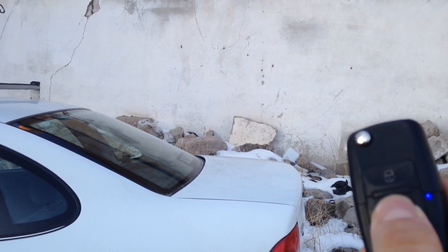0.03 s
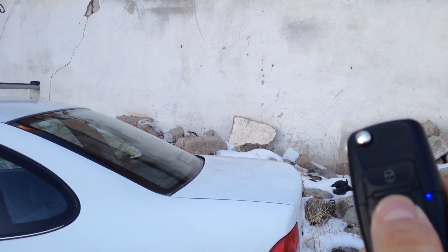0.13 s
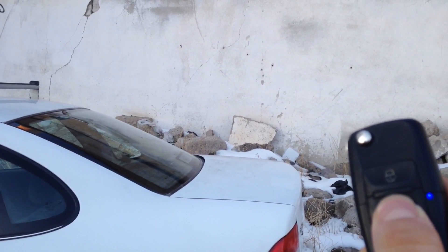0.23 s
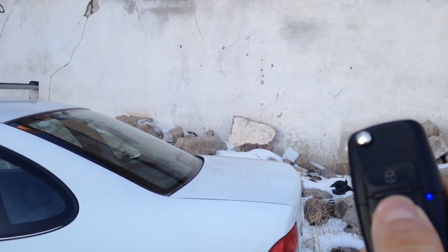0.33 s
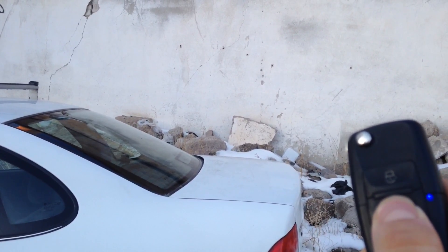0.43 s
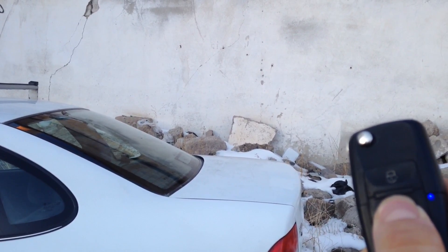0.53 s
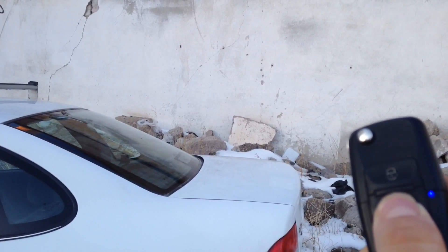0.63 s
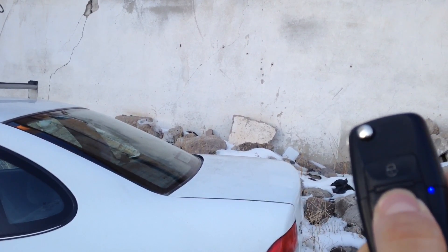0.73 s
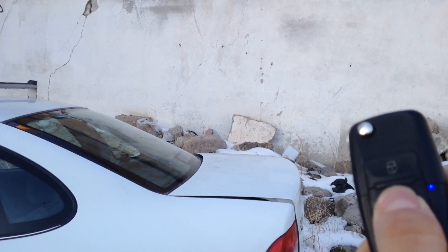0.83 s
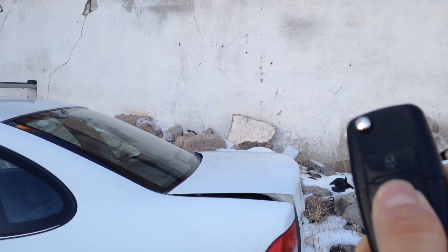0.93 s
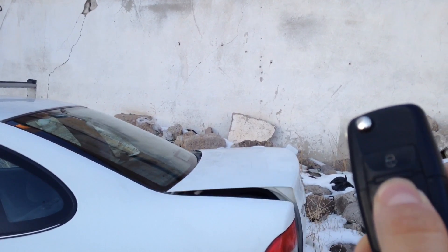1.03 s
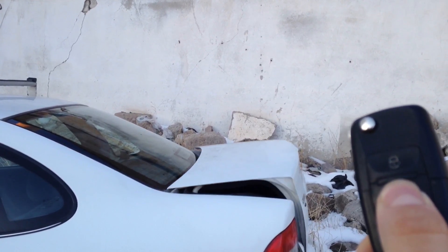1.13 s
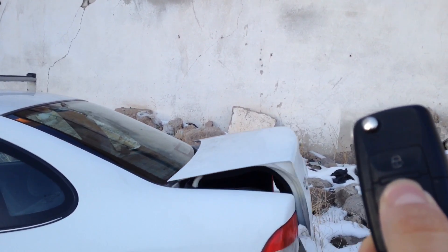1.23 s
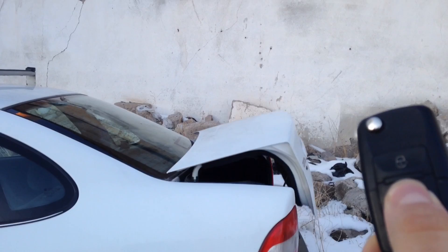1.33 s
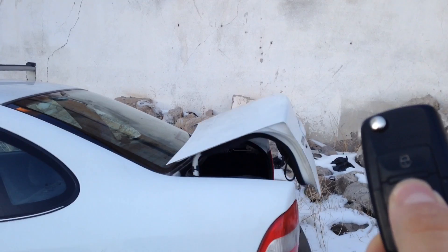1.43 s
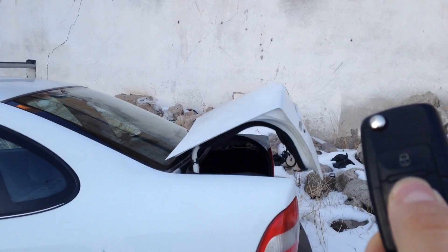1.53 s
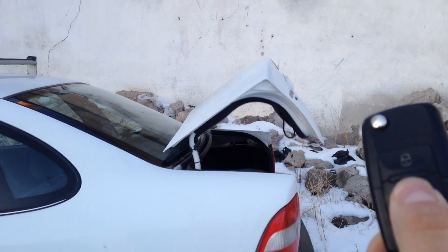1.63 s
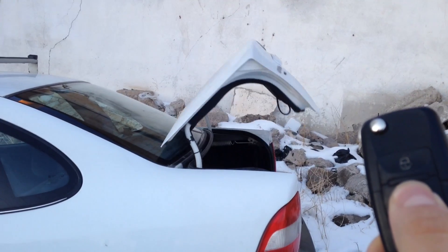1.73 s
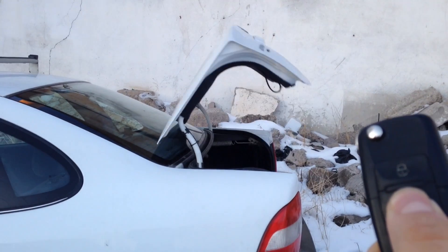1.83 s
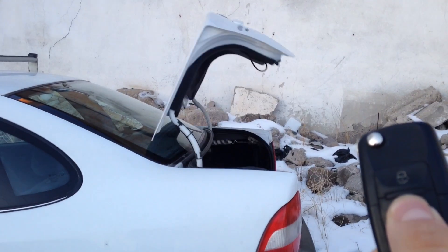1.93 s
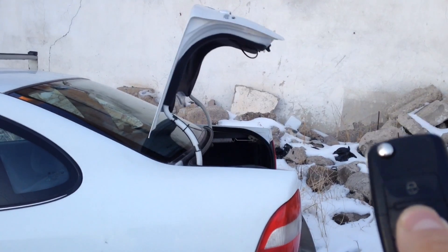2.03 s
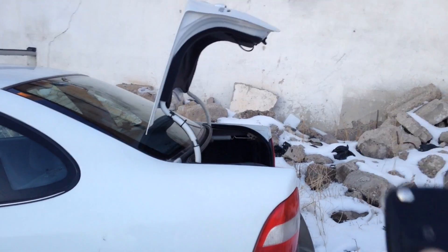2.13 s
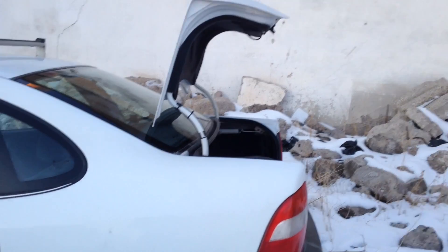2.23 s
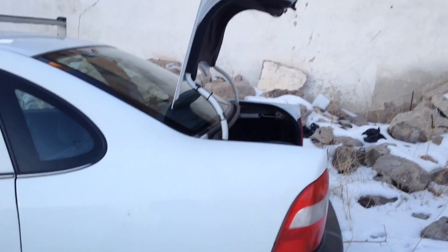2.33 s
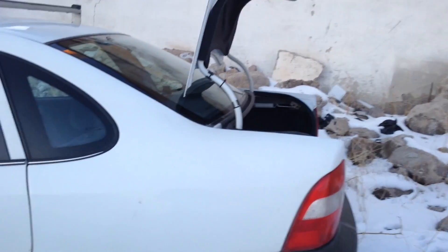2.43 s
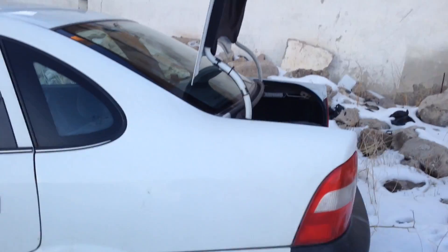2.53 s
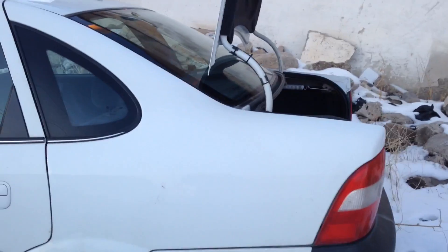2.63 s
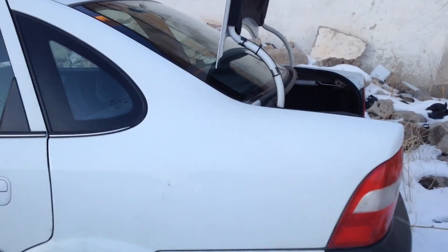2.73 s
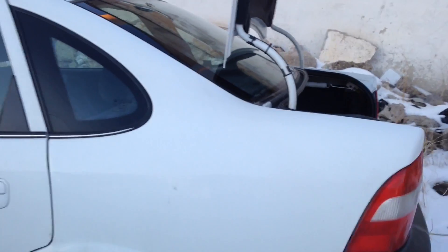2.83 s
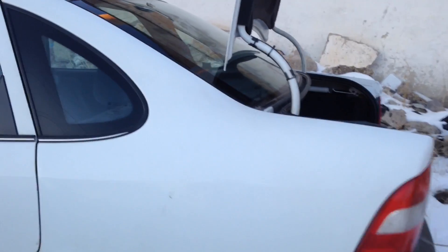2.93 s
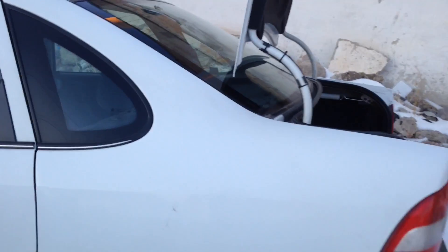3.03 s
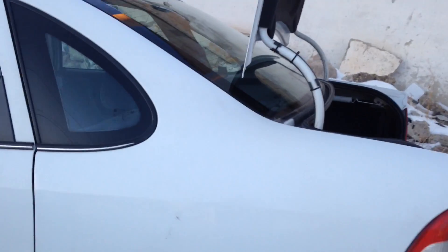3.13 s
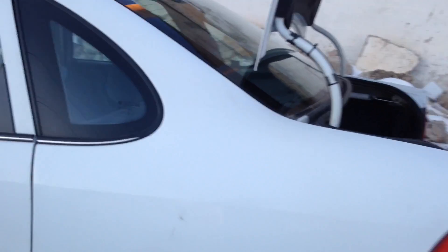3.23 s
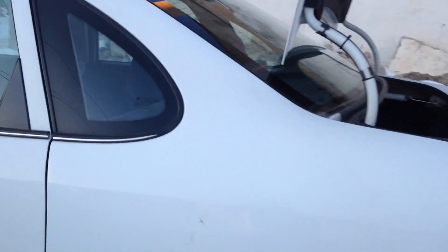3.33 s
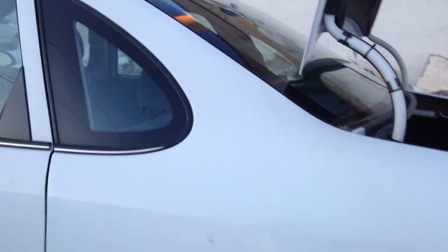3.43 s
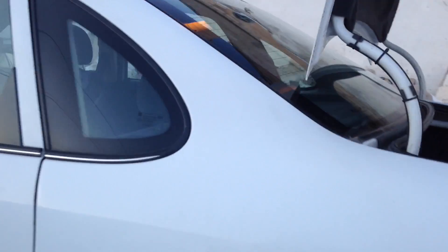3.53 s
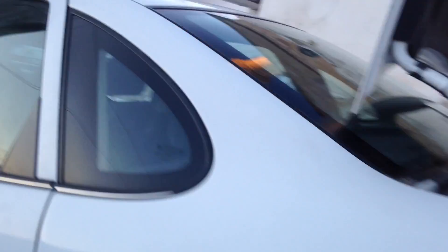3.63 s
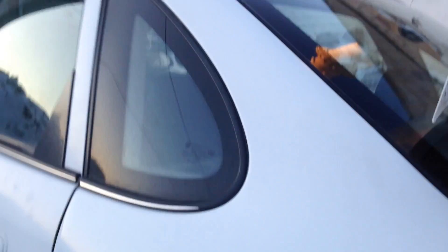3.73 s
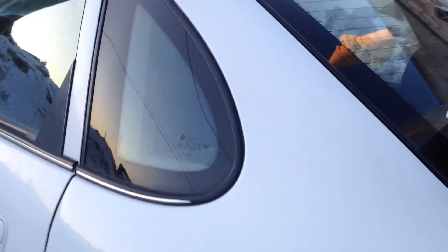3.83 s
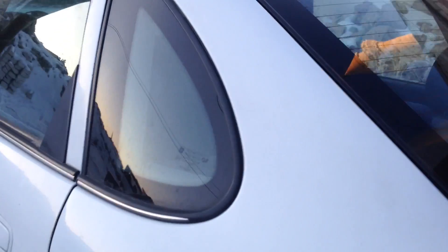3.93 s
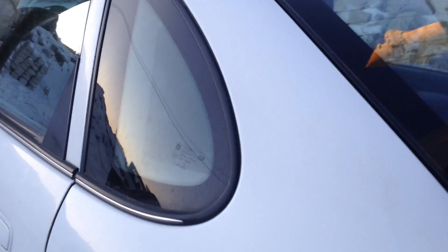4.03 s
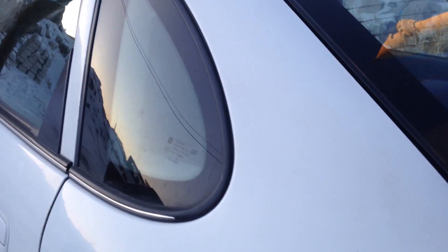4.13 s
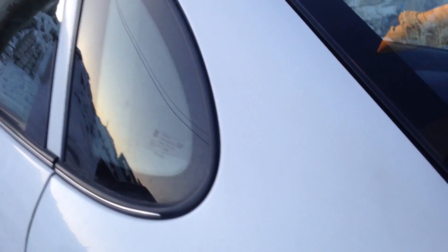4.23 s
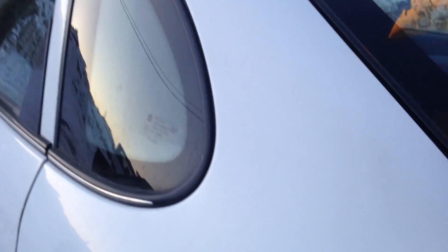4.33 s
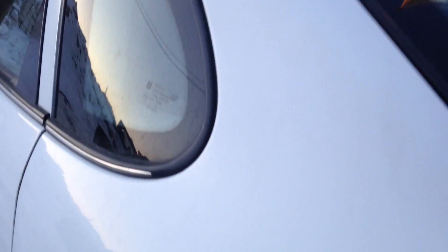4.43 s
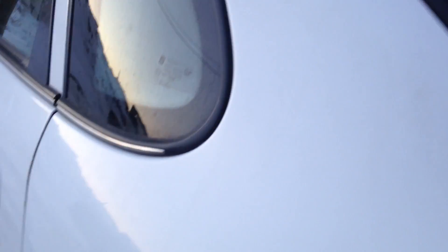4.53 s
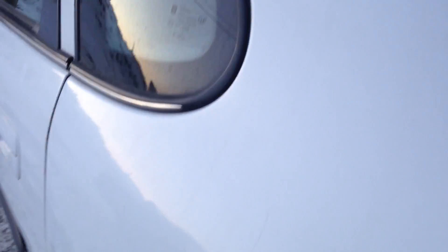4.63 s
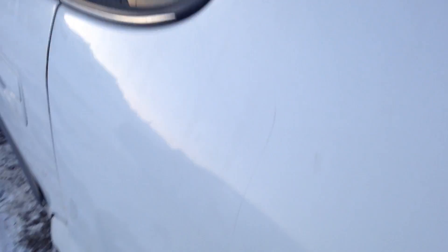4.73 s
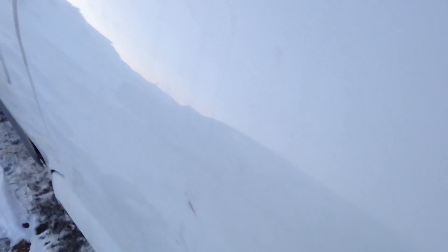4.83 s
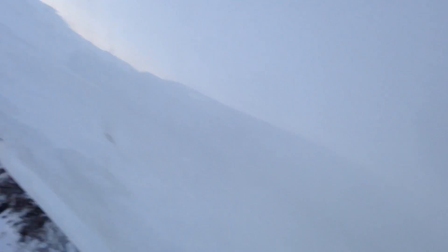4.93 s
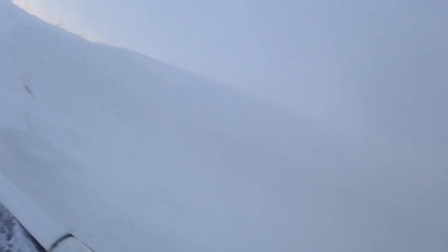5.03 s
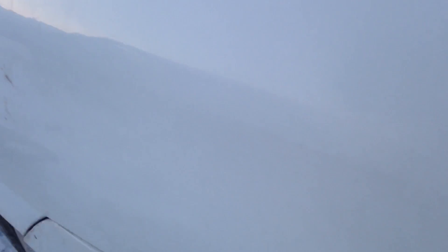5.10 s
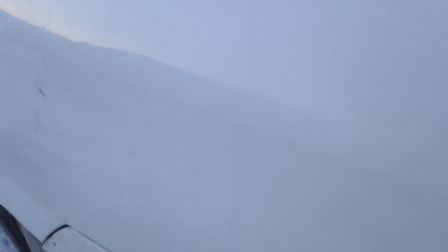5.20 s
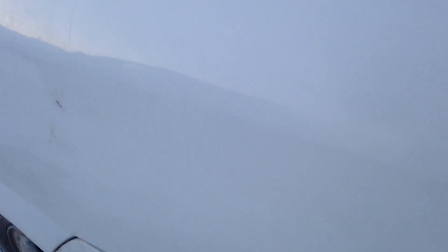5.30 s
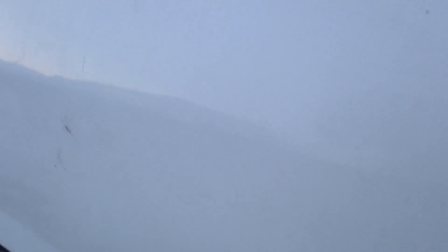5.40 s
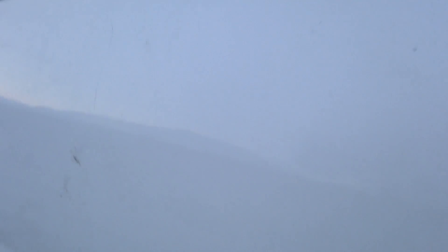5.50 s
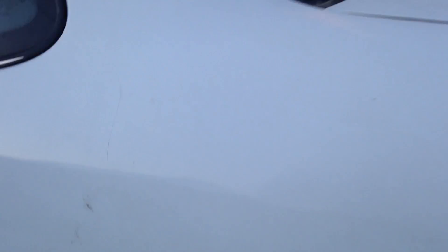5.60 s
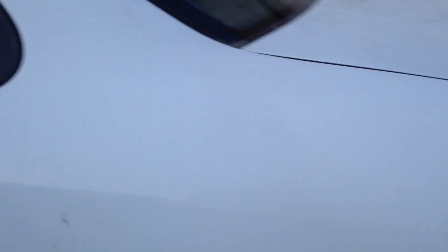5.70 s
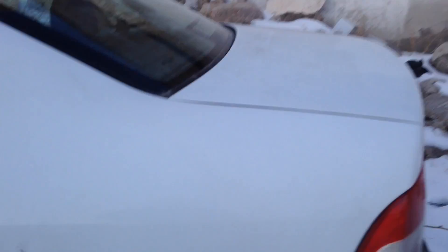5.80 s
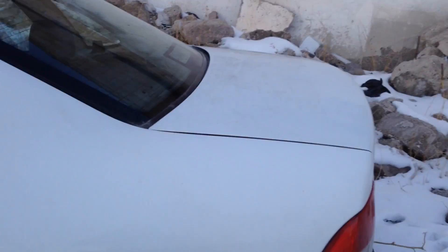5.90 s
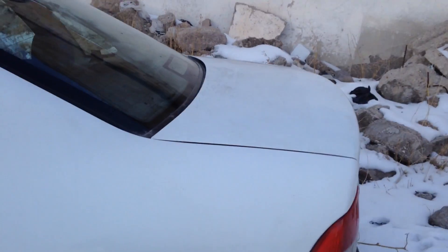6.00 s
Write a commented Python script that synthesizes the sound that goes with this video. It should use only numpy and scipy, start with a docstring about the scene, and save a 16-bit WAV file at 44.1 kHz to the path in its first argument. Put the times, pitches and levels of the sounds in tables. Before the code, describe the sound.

A car boot lock pops open with a short electric whirr and a muffled clunk, close to a hand-held microphone outdoors. Soft hinge jolts and sleeve swishes follow, then uneven footfalls, gritty scrapes, rustling clothes and handling rumble. Near the end the boot lid slams, by far the loudest event, clashing and booming briefly, before a few heavy bumps and a last scuff.

```python
"""A car boot is released by remote: motor noise whirrs, then damped modes and decaying noise clunk at the latch.
The lid, a low damped resonator, jolts on its hinges as it rises. Someone walks over on frozen ground: friction
noise scuffs, filtered noise and snaps rustle as clothes, damped resonances thump and tiny contacts tick.
The lid is grabbed and slammed: air rumbles, panel modes clash and cavity modes boom; then a low hum, thumps,
a last scuff and rustle are heard. Coloured noise makes the quiet outdoor air throughout."""
import sys
import numpy as np
from scipy import signal
from scipy.io import wavfile
from scipy.ndimage import uniform_filter1d

SR = 44100
rng = np.random.default_rng(int(sys.argv[2]) if len(sys.argv) > 2 else 0)


def dump(signal):
    """Clip the signal to [-1, 1] and save it as 16-bit WAV at the path in sys.argv[1]."""
    limited = np.clip(np.atleast_2d(signal).T, -1, 1)
    pcm = np.round(limited * 32767).astype(np.int16)
    wavfile.write(sys.argv[1], SR, pcm)


N = 267246
TIME = np.arange(N) / SR
EDGES_HZ = 20 * 2 ** (np.arange(30) / 3)   # third octaves
CENTRES_HZ = np.sqrt(EDGES_HZ[1:] * EDGES_HZ[:-1])
CUTOFF_HZ = 15400

# contacts of the slam: (time [s], level [dB], tilt [dB per octave], ring length [factor])
SLAM_CONTACTS = [(5.2078, -22.5, 2, 0.65), (5.2130, -15, -1, 0.77), (5.217, -16, -0.5, 0.82),
                 (5.2207, -21, 2, 0.2), (5.2396, -13.5, -2, 0.39), (5.249, -37.5, 6, 0.69),
                 (5.2713, -31.5, 4.5, 0.22), (5.3109, -42, -2, 1.0), (5.33, -39, -4, 0.98)]
# spectrum of the slam's dense ring: (frequency [Hz], level [dB])
SLAM_SPECTRUM = [(260, 2), (400, -4.5), (500, -2), (750, -13), (950, -3), (1200, -12.5), (1550, -6.5),
                 (1950, -18.5), (2300, -13), (3300, -17.5), (5300, -20.5), (7000, -26.5), (14000, -35),
                 (15500, -51)]
# decay of the slam's dense ring: (frequency [Hz], t60 [s])
SLAM_T60 = [(200, 0.57), (500, 0.35), (1200, 0.33), (4000, 0.26), (12000, 0.17)]
# steel panels round the latch: (frequency [Hz], level [dB], t60 [s])
PANEL_RINGS = [(370, -5, 0.22), (580, -7.5, 0.11), (710, -15, 0.15), (827, -22, 0.092), (917, -2, 0.17),
               (944, -20, .17), (1109, -15, 0.2), (1483, -8, .09), (1598, -7, 0.09), (2240, -23, 0.2),
               (2790, -20, 0.25), (3630, -32, 0.12), (5220, -4, 0.03)]
# boot cavity and lid: (frequency [Hz], level [dB], t60 [s])
CAVITY_MODES = [(52.2, -20.5, 0.63), (86, -3.5, 0.22), (110.5, -15.5, 0.36), (144.4, -12, 0.36),
                (161.1, -11, 0.34), (197.5, -30, 0.99), (196.5, -29, 0.23), (242, -29, 0.21),
                (267.5, -22, 0.26), (362, -20, 0.25), (397, -24.5, 0.33)]
# the lid lands on its seal and settles: (time [s], level [dB], contact [s])
SEAL_LANDINGS = [(5.2164, 5.5, 0.00039), (5.321, -17.5, 0.00056)]
# low rumble of air squeezed out by the closing lid, then a lingering hum: (time [s], level [dB])
AIR_RUMBLE = [(5.13, -52), (5.185, -51), (5.207, -24), (5.225, -27), (5.3, -42), (5.42, -60), (5.6, -49.5),
              (5.68, -44.5)]
# spectrum of that rumble: (frequency [Hz], level [dB])
AIR_SPECTRUM = [(40, -3), (70, 7.5), (160, 16.5), (260, -8), (500, -29)]

# actuator pulling the pawl: (time [s], level [dB])
MOTOR_LEVEL = [(.75, -68), (.767, -43.5), (.79, -44), (.806, -37), (.82, -37.5), (.84, -79)]
# spectrum of the actuator: (frequency [Hz], level [dB])
MOTOR_SPECTRUM = [(71, -44), (120, -10), (297, 0.5), (720, -23), (857, -15), (1440, -24), (1620, -14),
                  (2330, -15.5), (2620, -15), (3360, -15), (4670, -24.5), (5550, -38), (12000, -53),
                  (15600, -74), (22000, -120)]
# latch lets go, lid jumps off its seal: (time [s], level [dB], tilt [dB per octave], ring length [factor])
RELEASE_CONTACTS = [(0.8098, -35.5, 4.5, 0.94), (0.8128, -33.5, -3.5, 0.86), (0.829, -45.5, 11, 1.72),
                    (.845, -44, 2, 0.45), (0.903, -53, -14, 0.98), (0.929, -63.5, 8, 2.2),
                    (.956, -61, -17, 0.31)]
# spectrum of the release's dense ring: (frequency [Hz], level [dB])
RELEASE_SPECTRUM = [(71, -43), (120, -30), (256, 3), (429, -21), (579, 4.5), (652, -4), (862, -2.5),
                    (1190, -6), (1360, -3), (1600, -12.5), (2290, -11), (2480, -13), (3400, -21),
                    (7110, -50.5), (14000, -68)]
# decay of the release's dense ring: (frequency [Hz], t60 [s])
RELEASE_T60 = [(250, 0.35), (1000, 0.2), (4000, 0.11), (12000, 0.21)]
# ring of the lock plate and lid skin: (frequency [Hz], level [dB], t60 [s])
LOCK_PLATE_MODES = [(265, 4.5, 0.22), (350, -2, 0.22), (393, -22, 0.2), (487, 1, 0.18), (522, -4, 0.19),
                    (862, 15, 0.071), (1215, 10, 0.081), (1410, 9, 0.048), (1950, -17, 0.079),
                    (2300, -3.5, 0.12), (2190, -5, 0.1), (3500, -7, 0.053)]
# the pawl hitting its stop: (frequency [Hz], level [dB], t60 [s])
PAWL_STOP_MODES = [(343, -26, 0.14), (816, -14.5, 0.019), (934, -34, 0.021)]
SPREAD_S = .0007   # time constant of a blow spreading through the metal

# lid jolts on its hinges as it rises, is grabbed later: (time [s], level [dB], pitch [Hz], rattle [dB])
LID_JOLTS = [(1.765, -39.5, 397, 6.5), (1.775, -32.5, 197.7, -3.5), (1.917, -32.5, 227, -7.5),
             (1.987, -35, 197, -11.5), (2.041, -31.5, 196.8, -10.5), (2.289, -44.5, 208.3, 6.5),
             (5.052, -35, 157.4, -14.5), (5.1, -39.5, 169, -30)]
LID_RING_S = 0.22   # t60

# heavy footfalls and thumps of the hand on the microphone:
# (time [s], level [dB], pitch [Hz], length until it has died by 60 dB [cycles])
HEAVY_THUMPS = [(2.728, -37.5, 176, 7.3), (2.778, -32.5, 215, 13.6), (2.833, -29.5, 201, 14),
                (3.691, -34.5, 298, 28), (3.742, -23, 480, 13.6), (3.974, -25.5, 280, 8.6),
                (4.511, -32, 206, 18.5), (4.588, -40, 167, 22), (4.652, -37, 217, 6.4),
                (4.75, -34, 111, 12), (4.813, -30, 220, 12), (4.83, -25.5, 159, 6.8),
                (4.911, -37, 120, 10.4), (5.69, -26.5, 185.6, 15.7), (5.812, -17.5, 208, 3.1),
                (5.917, -19, 117, 5.7), (5.938, -17, 176, 3.6), (5.972, -28, 77.6, 11.3)]
# spectrum of the grit in a bump: (frequency [Hz], level [dB])
GRIT_SPECTRUM = [(60, -1.5), (200, -3.5), (400, -4.5), (800, -13.5), (2000, -26), (5000, -35), (14000, -99)]
GRIT_DB, GRIT_DB_PER_OCTAVE, GRIT_AT_HZ = -13.5, 7, 205   # higher thumps are grittier
# the weight settles after each thump: delay, pitch ratio, relative level, t60
SETTLE_S, SETTLE_PITCH, SETTLE_DB, SETTLE_RING_S = .016, .47, -16, .13

# soles scraping on frozen ground: (time of the top [s], half length [s], level [dB], crunch [dB])
SOLE_SCRAPES = [(2.787, 0.0065, -52, 5), (2.914, 0.025, -49.5, -7), (3.07, 0.016, -56, -22),
                (3.473, 0.018, -52.5, -4), (3.574, 0.016, -52, -8), (3.659, 0.019, -45, -24),
                (3.688, 0.022, -39.5, -18), (3.768, .02, -41.5, 1), (4.268, .018, -57.5, -26),
                (5.675, 0.09, -59.5, -20)]
# spectrum of plain friction: (frequency [Hz], level [dB])
FRICTION_SPECTRUM = [(88, -54), (150, -7.5), (509, -6), (631, -10.5), (827, -8.5), (1660, -8.5),
                     (2860, -19), (3760, -16.5), (13000, -31), (15500, -29)]
CRUNCH_HZ, CRUNCH_WIDTH_HZ = 1700, 2800   # width of each of two passes

# a sleeve sweeps over the jacket:
# (time of the top [s], half length [s], level [dB], hiss [Hz], plain friction under it [dB])
SLEEVE_SWEEPS = [(1.70, 0.037, -51, 2700, 2.5), (1.766, 0.041, -44.5, 2590, -3),
                 (1.912, 0.036, -60, 2430, 7), (3.272, 0.028, -51.5, 3110, 7),
                 (3.32, 0.029, -40, 3300, -2.5), (4.47, 0.024, -55, 1915, -17),
                 (4.71, 0.056, -55.5, 2030, -5)]
SWISH_WIDTH = 0.96   # of the hiss frequency, in each of two passes
# ribs of the cloth sing in short gliding streaks: 1/e half length, rise in a swish, low-pass edge, level
ZIP_HALF_S, ZIP_OCTAVES_PER_S, ZIP_WIDTH_HZ, ZIP_DB = 0.018, 4.3, 49, -3
# loudest of the singing streaks: (time [s], level [dB], pitch [Hz], rise [octaves per s])
LOUD_STREAKS = [(1.691, -45, 2370, 2), (1.705, -49, 1730, 0.5), (1.712, -51.5, 3750, 2.5),
                (1.755, -41.5, 2197, 1.5), (1.765, -45, 1046, -0.5), (3.297, -47, 2074, 4),
                (3.317, -48, 3340, -1)]

# the walker's bouts of movement: (start [s], end [s], level of the rustle [dB])
MOVEMENT_BOUTS = [(1.323, 1.40, -60.5), (1.864, 2.075, -63), (2.175, 2.38, -68.5), (2.583, 2.663, -80),
                  (2.751, 3.077, -53.5), (3.793, 4.227, -61.5), (4.276, 4.82, -62), (4.94, 5.09, -58.5),
                  (5.589, 5.9, -53.5)]
MOVE_ATTACK_S, MOVE_RELEASE_S = 0.025, 0.02
STIR_FROM_S, STIR_DB = 2.093, -65.5   # once under way, the clothes never come quite to rest
# spectrum of the rustling cloth: (frequency [Hz], level [dB])
CLOTH_SPECTRUM = [(82, -40), (140, 3), (225, -1), (290, 0), (590, -4.5), (840, -9), (1220, -8), (2040, -6),
                  (3020, -15.5), (3750, -13), (14000, -29.5), (15500, -12)]

# small sharp ticks: (time [s], level [dB], frequency [Hz], width [Hz], t60 [s])
SHARP_TICKS = [(1.0021, -31.5, 1000, 3500, 0.0068), (1.914, -46.5, 1280, 2500, 0.071),
               (2.044, -53, 3300, 3000, 0.053), (2.727, -55.5, 1500, 2500, 0.062),
               (2.775, -68, 1220, 2000, .055), (3.65, -53, 1500, 2500, .036),
               (3.875, -44.5, 1140, 1190, 0.018), (3.976, -44.5, 2700, 4000, .026),
               (4.563, -47.5, 1690, 1490, 0.04), (4.661, -44, 1970, 895, 0.027),
               (4.811, -43, 1800, 2500, 0.012), (4.934, -44.5, 1000, 490, 0.04),
               (5.796, -36, 2740, 3370, 0.016)]

# the microphone rumbles in the hand on the last steps: (start [s], end [s], level [dB])
GRIP_SHIFTS = [(4.28, 4.40, -54), (4.46, 4.72, -49), (4.8, 4.93, -51)]
# spectrum of that rumble: (frequency [Hz], level [dB])
GRIP_SPECTRUM = [(60, -8), (110, 1), (180, 0.5), (320, -4), (600, -24), (1500, -50)]

# spectrum of the quiet outdoor air: (frequency [Hz], level [dB])
AIR_OUTDOORS = [(13, -40), (22, -20), (70, -4.5), (154, -15), (203, -8.5), (290, -13.5), (502, -17.5),
                (560, -20.5), (997, -21), (1870, -31), (3820, -28), (15500, -33)]
OUTDOORS_DB = -60.5   # rms


def from_db(db):
    """Logarithmic level: decibels to amplitude gain."""
    return 10 ** (np.asarray(db) / 20)


def rms_one(x):
    """Power normalisation: scale to unit rms."""
    return x / np.sqrt(np.mean(x ** 2) + 1e-20)


def level(rows):
    """Amplitude envelope: gain through (time, dB) rows, silent outside them."""
    s, db = np.transpose(rows)
    return from_db(np.interp(TIME, s, db, left=-np.inf, right=-np.inf))


def per_band(points):
    """Logarithmic frequency scale: read a (Hz, value) table at the third-octave centres."""
    hz, value = np.transpose(points)
    return np.interp(np.log(CENTRES_HZ), np.log(hz), value)


def noise_bands():
    """Third-octave filtering of white noise; two sources alternate so that neighbours are unrelated."""
    white = rng.standard_normal((2, N))
    bands = []
    for k in range(len(CENTRES_HZ)):
        band_pass = signal.butter(2, EDGES_HZ[k:k + 2], "band", fs=SR, output="sos")
        bands.append(signal.sosfilt(band_pass, white[k % 2]))
    return np.array(bands)


def band_gains(colour, tilt_db=0):
    """Spectral shaping: band gains tilted per octave, falling below the first point, for unit noise rms."""
    skirt = np.minimum(CENTRES_HZ / colour[0][0], 1) ** 2
    gain = from_db(per_band(colour) + tilt_db * np.log2(CENTRES_HZ)) * skirt
    power = np.sum(gain ** 2 * np.diff(EDGES_HZ)) * 2 / SR
    return gain / np.sqrt(power)


def grain(per_s, depth_db):
    """Random amplitude modulation: a rough gain of unit rms."""
    knots = rng.standard_normal(N)
    return rms_one(from_db(depth_db * np.interp(TIME * per_s, np.arange(N), knots)))


def fade(t60, size):
    """Exponential decay: 60 dB down after t60 seconds."""
    return np.exp(-np.log(1000) * TIME[:size] / t60)


def ring(modes, size):
    """Modal superposition: the decaying sines of a struck body."""
    return sum(from_db(db) * fade(t60, size) * np.sin(2 * np.pi * hz * TIME[:size]) for hz, db, t60 in modes)


def resonance(x, hz, width_hz):
    """Damped resonance: a two-pole band-pass with about unit gain on top."""
    r = np.exp(-np.pi * width_hz / SR)
    zeros = np.array([1, 0, -1]) * (1 - r * r) / 2
    poles = [1, -2 * r * np.cos(2 * np.pi * hz / SR), r * r]
    return signal.lfilter(zeros, poles, x)


def add(out, s, sound):
    """Linear superposition: mix a sound in from time s."""
    start = int(s * SR)
    out[start:start + len(sound)] += sound[:N - start]


def stroke(s, half_s):
    """Smooth friction envelope: the swell and fade of one rub."""
    return 1 / np.cosh(np.minimum(np.abs(TIME - s) / half_s, 10)) ** 2


def bouts(rows):
    """Gated envelope: each (start, end, dB) row swells and dies away smoothly."""
    out = np.zeros(N)
    for start, end, db in rows:
        attack = (1 + np.tanh((TIME - start) / MOVE_ATTACK_S)) / 2
        release = (1 + np.tanh((end - TIME) / MOVE_RELEASE_S)) / 2
        out += from_db(db) * attack * release
    return out


def clatter(bands, contacts, colour, decay, modes, modes_db, crack_db=-3, crack_t60=0.058, size=SR // 2):
    """Impact excitation: each contact rings the main modes, at random strengths, and a dense cloud of weak ones."""
    out = np.zeros(N)
    hz, mode_db, mode_t60 = np.transpose(modes)
    build_up = 1 - np.exp(-TIME[:size] / SPREAD_S)
    crack = 1 + from_db(crack_db) * fade(crack_t60, size)   # the contact itself is louder than the ring after it
    for s, db, tilt_db, length in contacts:
        start = rng.integers(N - size)
        cloud = bands[:, start:start + size] * fade(length * per_band(decay)[:, None], size)
        add(out, s, from_db(db) * (band_gains(colour, tilt_db) @ cloud) * crack)
        strength = from_db(mode_db + tilt_db * np.log2(hz) + rng.normal(0, 1, len(hz)))
        strength *= rng.choice([-1, 1], len(hz)) / np.linalg.norm(strength)
        rings = fade(length * mode_t60[:, None], size) * np.sin(2 * np.pi * hz[:, None] * TIME[:size])
        add(out, s, from_db(db + modes_db) * (strength @ rings) * build_up)
    return out


def slam(bands, lowest_hz=44):
    """Impact and cavity resonance: air is pushed out, the latch clashes over the striker and the boot booms."""
    clash = clatter(bands, SLAM_CONTACTS, SLAM_SPECTRUM, SLAM_T60, PANEL_RINGS, modes_db=2.0)
    out = clash * grain(per_s=500, depth_db=2.0)
    boom = ring(CAVITY_MODES, size=SR)
    for s, db, contact_s in SEAL_LANDINGS:
        soft = np.exp(-1 / (contact_s * SR))   # a longer contact weakens the high modes
        add(out, s, from_db(db) * signal.lfilter([1 - soft], [1, -soft], boom))
    out += level(AIR_RUMBLE) * (band_gains(AIR_SPECTRUM) @ bands)
    # the slam carries little deep bass
    return signal.sosfilt(signal.butter(2, lowest_hz, "high", fs=SR, output="sos"), out)


def unlatch(bands, rise_s=0.0017, lowest_hz=170, highest_hz=6000):
    """Forced noise, then free ringing: a geared motor pulls the pawl onto its stop and the latch snaps open."""
    motor = level(MOTOR_LEVEL) * (band_gains(MOTOR_SPECTRUM) @ bands) * grain(per_s=360, depth_db=0.5)
    snap = clatter(bands, RELEASE_CONTACTS, RELEASE_SPECTRUM, RELEASE_T60, LOCK_PLATE_MODES, modes_db=10.0)
    pawl = ring(PAWL_STOP_MODES, size=SR) * (1 - np.exp(-TIME[:SR] / rise_s))
    add(snap, RELEASE_CONTACTS[0][0], pawl)
    # small parts make no bass; the snap has little high treble
    muffle = signal.butter(3, [lowest_hz, highest_hz], "band", fs=SR, output="sos")
    return motor + signal.sosfilt(muffle, snap)


def bump(grit, hz, t60, grit_db, grit_t60, rise_s=0.0018, overtone=1.52, overtone_db=-8,
         lowest_ratio=0.37, size=SR // 3):
    """Damped free vibration: a soft push rings a low resonance and an overtone, with a puff of grit."""
    start = rng.integers(N - size)
    puff = from_db(grit_db) * grit[start:start + size] * fade(grit_t60, size)
    overtone_hz = hz * overtone * rng.uniform(0.76, 1.1)
    body = ring([(hz, 0, t60), (overtone_hz, overtone_db, t60)], size)
    onset = 1 - np.exp(-TIME[:size] / rise_s)
    low_cut = signal.butter(2, lowest_ratio * hz, "high", fs=SR, output="sos")
    return signal.sosfilt(low_cut, onset * (body + puff))


def lid_knocks(grit, rattle_t60=0.15):
    """Free vibration of the open lid: each jolt leaves it humming while its hinges rattle briefly."""
    out = np.zeros(N)
    for s, db, hz, rattle_db in LID_JOLTS:
        add(out, s, from_db(db) * bump(grit, hz, LID_RING_S, rattle_db, rattle_t60))
    return out


def thump(grit, hz, t60):
    """Heavily damped impact: the higher its pitch, the grittier."""
    return bump(grit, hz, t60, GRIT_DB + GRIT_DB_PER_OCTAVE * np.log2(hz / GRIT_AT_HZ), t60)


def thumps(grit):
    """Successive impacts: after each heavy thump the weight settles, lower and softer."""
    out = np.zeros(N)
    for s, db, hz, cycles in HEAVY_THUMPS:
        add(out, s, from_db(db) * thump(grit, hz, cycles / hz))
        settling = thump(grit, hz * SETTLE_PITCH, SETTLE_RING_S)
        add(out, s + SETTLE_S, from_db(db + SETTLE_DB) * settling)
    return out


def scuffs(friction):
    """Sliding friction: gritty noise swells and fades under each sole, with a resonant crunch added."""
    crunch = resonance(friction, CRUNCH_HZ, CRUNCH_WIDTH_HZ)
    crunch = resonance(crunch, CRUNCH_HZ, CRUNCH_WIDTH_HZ)
    out = np.zeros(N)
    for s, half_s, db, crunch_db in SOLE_SCRAPES:
        out += from_db(db) * stroke(s, half_s) * (friction + from_db(crunch_db) * crunch)
    return out


def zip_streak(hz, octaves_per_s, size=SR // 4):
    """Narrow-band modulation: ribbed cloth sings briefly in a gliding, unsteady band."""
    t = TIME[:size] - TIME[size] / 2
    white = rng.standard_normal(size) + 1j * rng.standard_normal(size)
    waver = signal.sosfilt(signal.butter(2, ZIP_WIDTH_HZ, fs=SR, output="sos"), white)
    phase = 2 * np.pi * np.cumsum(hz * 2 ** (octaves_per_s * t)) / SR
    song = rms_one(np.real(waver * np.exp(1j * phase)))
    return np.exp(-(t / ZIP_HALF_S) ** 2) * song


def swishes(friction, offset_db=-3, spread_octaves=0.58, scatter=0.73, count=7):
    """Resonant friction: a sleeve hisses over plain friction, with singing streaks scattered through the stroke."""
    out = np.zeros(N)
    for s, half_s, db, hz, friction_db in SLEEVE_SWEEPS:
        hiss = resonance(friction, hz, SWISH_WIDTH * hz)
        hiss = rms_one(resonance(hiss, hz, SWISH_WIDTH * hz))
        out += from_db(db + offset_db) * stroke(s, half_s) * (hiss + from_db(friction_db) * friction)
        draws = rng.uniform(-1.1, 1, (count, 2))
        for place, (when, detune) in zip(np.linspace(-1, 1 / 2, count), draws):
            streak_hz = hz * 2 ** (spread_octaves * (place + detune / count))
            streak = zip_streak(streak_hz, ZIP_OCTAVES_PER_S)
            # loudest near the resonance
            strength = from_db(db + ZIP_DB) * np.exp(-place ** 2) / np.sqrt(count / 2)
            add(out, s + scatter * half_s * when - len(streak) / SR / 2, strength * streak)
    return out


def zips():
    """Narrow-band prominence: a few singing streaks stand out of the swishes."""
    out = np.zeros(N)
    for s, db, hz, octaves_per_s in LOUD_STREAKS:
        streak = zip_streak(hz, octaves_per_s)
        add(out, s - len(streak) / SR / 2, from_db(db) * streak)
    return out


def movement():
    """Amplitude envelope of the walker: bouts of movement, and a slight stir that stays once under way."""
    stir = (1 + np.tanh((TIME - STIR_FROM_S) / MOVE_ATTACK_S)) / 2
    return bouts(MOVEMENT_BOUTS) + from_db(STIR_DB) * stir


def crackle(per_s=45, spread_db=7.5, hz=1700, width_hz=1900, pop_s=0.0019):
    """Random impulse process: creases and icy grit snap, each in a tiny broad pop; unit rms."""
    sizes = from_db(spread_db * np.minimum(rng.exponential(1, N), 2))
    snaps = (rng.random(N) < per_s / SR) * sizes
    linger = np.exp(-1 / (pop_s * SR))
    pops = signal.lfilter([1], [1, -linger], snaps + 1e-18) * rng.standard_normal(N)
    return rms_one(resonance(pops, hz, width_hz))


def clothes(moving, crackle_db=-10):
    """Amplitude-modulated friction noise: cloth rustles and crackles in step with the movement."""
    cloth = (band_gains(CLOTH_SPECTRUM) @ noise_bands()) * grain(per_s=100, depth_db=2.0)
    return moving * (cloth + from_db(crackle_db) * crackle())


def ticks(size=SR // 10, top_ratio=2.36):
    """Short hard impact: a crack of noise in one resonance, with little above it."""
    out = np.zeros(N)
    for s, db, hz, width_hz, t60 in SHARP_TICKS:
        dying = fade(t60, size)
        crack = resonance(rng.standard_normal(size) * dying, hz, width_hz)
        high_cut = signal.butter(5, min(top_ratio * hz, CUTOFF_HZ), fs=SR, output="sos")
        crack = signal.sosfilt(high_cut, crack)
        # same energy whatever the filtering
        add(out, s, from_db(db) * crack * np.linalg.norm(dying) / np.linalg.norm(crack))
    return out


def handling(bands):
    """Structure-borne noise: the grip shifts on the microphone in a low, lumpy rumble."""
    return bouts(GRIP_SHIFTS) * (band_gains(GRIP_SPECTRUM) @ bands) * grain(per_s=54, depth_db=7.0)


def outdoor_air():
    """Stationary background noise: quiet outdoor air as steady coloured noise."""
    return from_db(OUTDOORS_DB) * (band_gains(AIR_OUTDOORS) @ noise_bands())


def scene():
    """Superposition of sources: the lock, the walk and the slam over quiet outdoor air."""
    bands = noise_bands()
    grit = band_gains(GRIT_SPECTRUM) @ bands
    friction = (band_gains(FRICTION_SPECTRUM) @ bands) * grain(per_s=870, depth_db=2.0)
    car = slam(bands) + unlatch(bands) + lid_knocks(grit)
    steps = thumps(grit) + scuffs(friction) + ticks() + handling(bands)
    clothing = swishes(friction) + zips() + clothes(movement())
    return (car + steps + clothing + outdoor_air())[None]


def record(dry, threshold_db=-12, squeeze=0.31, release_db_per_s=4.0):
    """Dynamic compression: loud sound ducks the gain, which recovers slowly; peaks are rounded, the top is cut."""
    power = uniform_filter1d(dry[0] ** 2, size=SR // 80)
    loudness_db = 10 * np.log10(np.abs(power) + 1e-12)
    duck_db = squeeze * np.maximum(loudness_db - threshold_db, 0)
    recovery_db = release_db_per_s * TIME
    held_db = np.maximum.accumulate(duck_db + recovery_db) - recovery_db
    ducked = dry * from_db(-held_db)
    rounded = ducked / (1 + (ducked / .98) ** 8) ** (1 / 8)   # just under full scale
    return signal.sosfilt(signal.ellip(10, .1, 80, CUTOFF_HZ, fs=SR, output="sos"), rounded)


dry = scene()
out = record(dry)
dump(out)
```